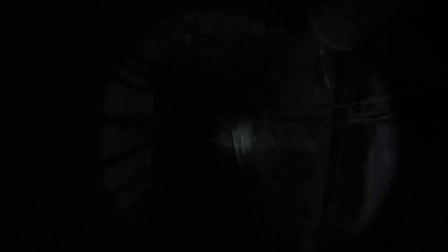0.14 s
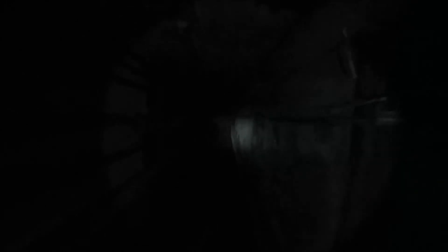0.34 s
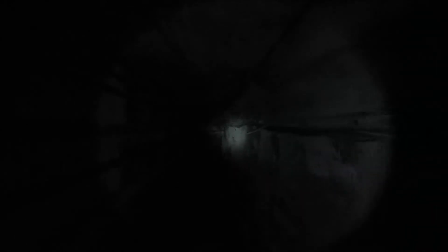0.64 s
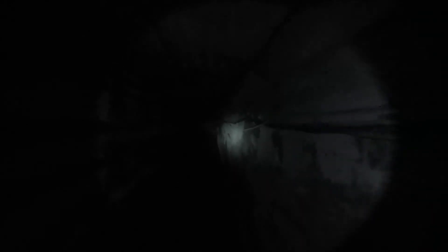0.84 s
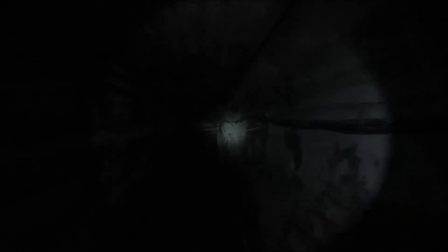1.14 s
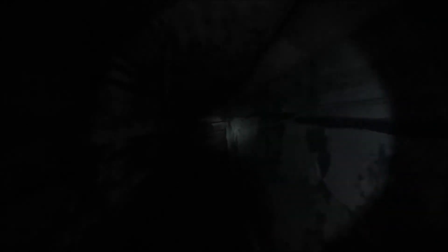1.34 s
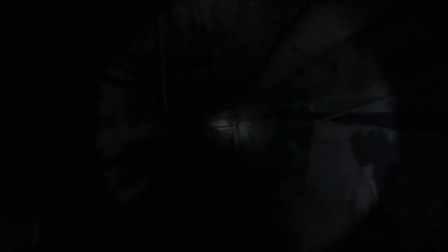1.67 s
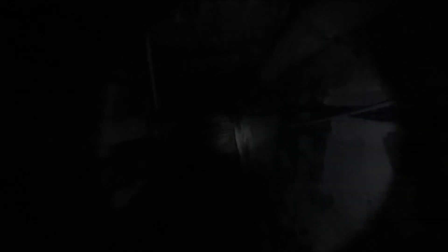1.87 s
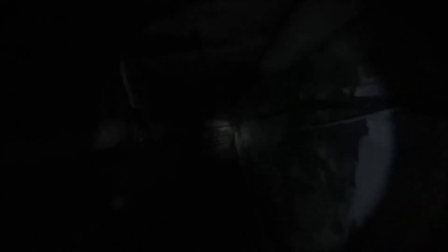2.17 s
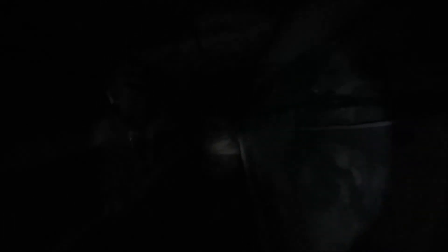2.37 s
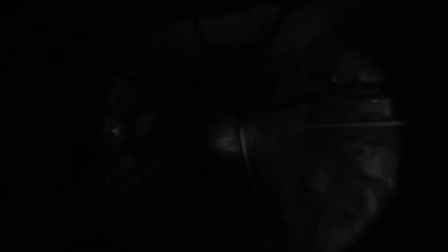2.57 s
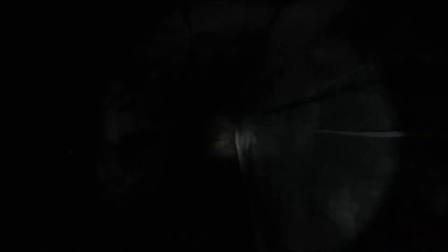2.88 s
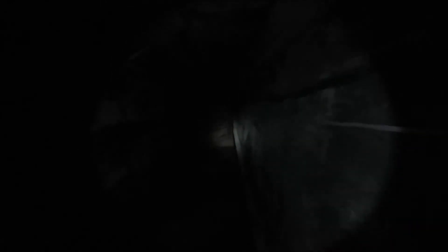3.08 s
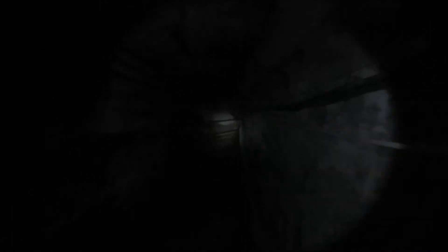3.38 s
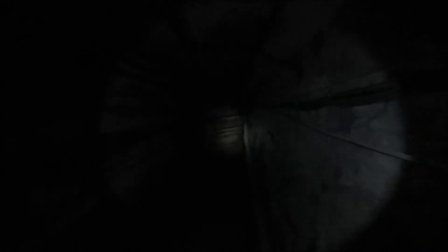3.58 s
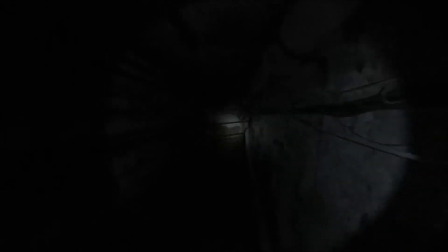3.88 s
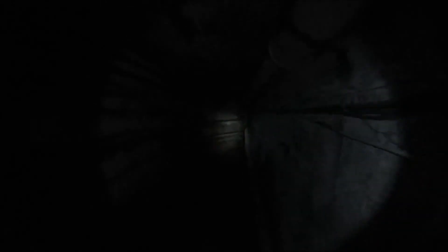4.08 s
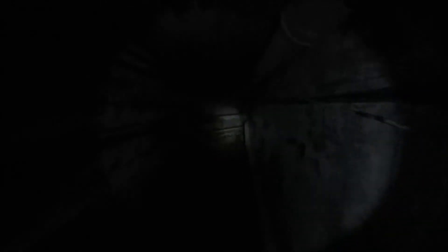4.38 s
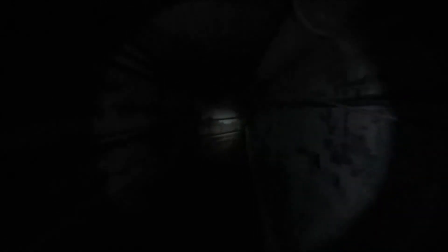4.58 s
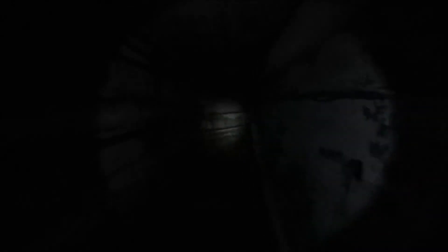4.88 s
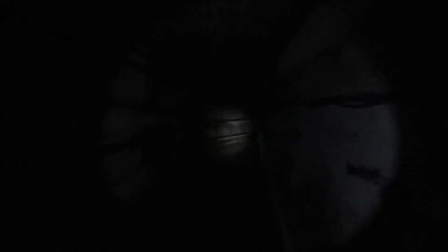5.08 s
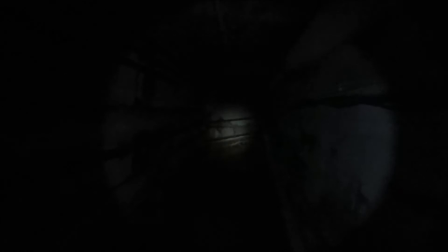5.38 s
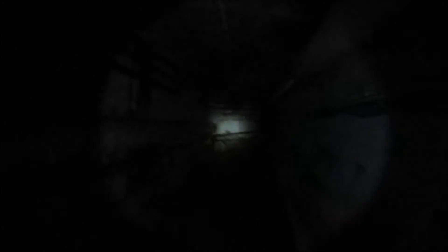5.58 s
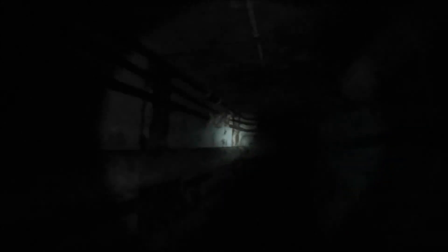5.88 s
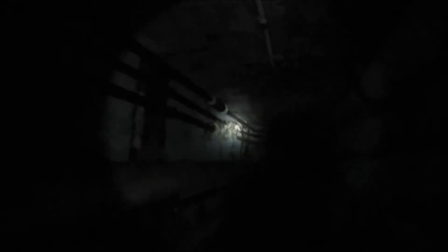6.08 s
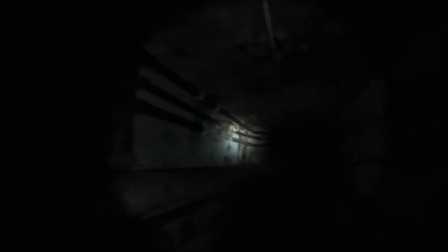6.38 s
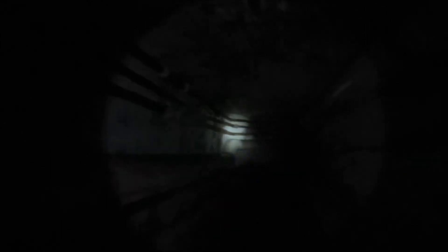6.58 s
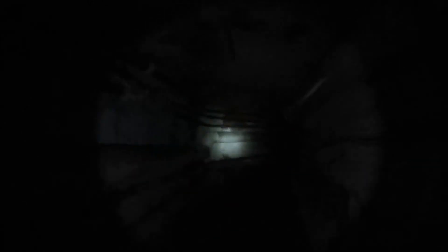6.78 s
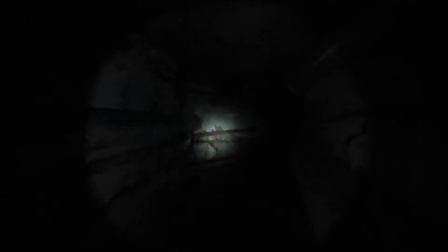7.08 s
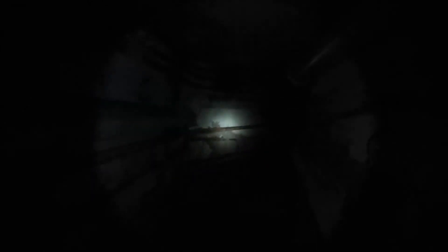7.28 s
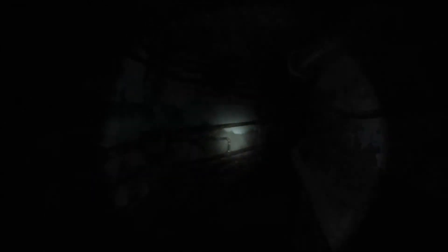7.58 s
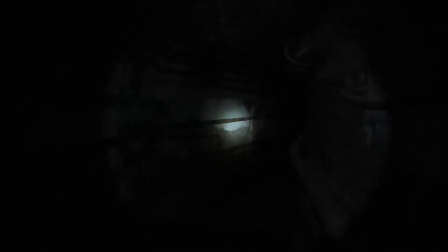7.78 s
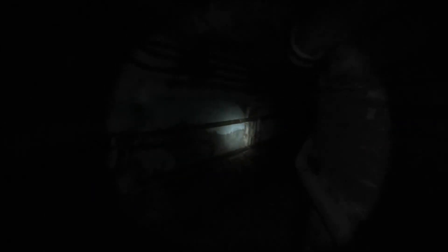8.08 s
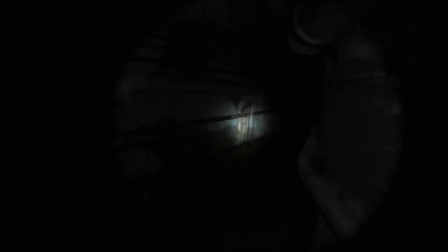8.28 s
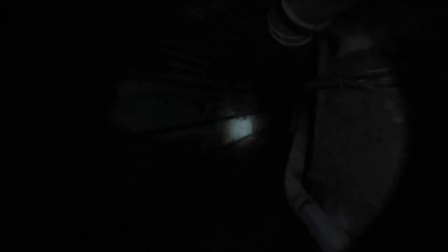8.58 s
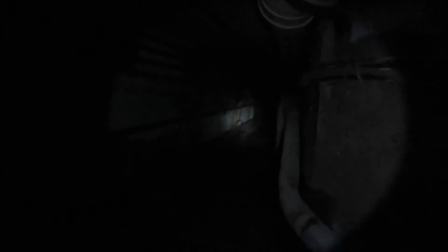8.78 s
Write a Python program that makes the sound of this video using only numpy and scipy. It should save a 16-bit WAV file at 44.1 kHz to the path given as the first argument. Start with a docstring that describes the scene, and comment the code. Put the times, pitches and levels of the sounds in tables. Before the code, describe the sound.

A walker moves through a narrow round concrete tunnel, carrying the microphone. Shoes grind over sand and fine grit in short uneven scuffs, several each second, with tiny grains ticking between. Dull knocks and a strong scrape come within the first half second; a sharp stony clack at 1.4 s is the clearest knock, followed at once by a bright scuff. Softer drags and crunches follow around 2 to 3.6 s, a small cluster of clicks at 3.8, and the hardest grinding step at 4.85. Steps go on to the end at 9 s, with stone ticks near 6.1 and 6.8. Close wall reflections and a brief echo of under half a second surround them, and heavy treads leave a faint low hollow ring. Dry, dull hand bumps sit close, scattered from 1.1 s, strongest near 6.25, 6.9 and 7.85 s. Faint hiss and unsteady low rumble lie underneath.

```python
"""Footsteps in a round concrete tunnel: someone walks over a gritty floor, carrying a camera.
Soles grind as shaped bursts of random grains; heels and loose stones clack as fading noise and rings.
Random close reflections and a short decaying echo answer them, and heavy treads ring the air across the tube.
Close by, the hand bumps the camera, over a faint rumble and hiss of filtered noise."""
import sys
import numpy as np
from scipy import signal
from scipy.fft import rfft, irfft, next_fast_len
from scipy.io import wavfile
from scipy.ndimage import map_coordinates

SR = 44100
rng = np.random.default_rng(int(sys.argv[2]) if len(sys.argv) > 2 else 0)


def file_out(sig):
    """Save sig as 16-bit WAV at sys.argv[1]."""
    # one column per channel
    cols = np.atleast_2d(sig).T
    # limit, then scale
    lim = np.clip(cols, -1, 1)
    pcm = np.round(lim * 32767).astype(np.int16)
    wavfile.write(sys.argv[1], SR, pcm)


N = 394254  # samples in the scene


def amp(db):
    """Decibels to gain."""
    return 10 ** (np.asarray(db) / 20)


def unit(x):
    """Scale x to rms 1."""
    return x / np.sqrt(np.mean(x ** 2) + 1e-20)


def along(points, hz):
    """Read (Hz, value) points between their frequencies on a log axis."""
    f, v = np.transpose(points)
    return np.interp(np.log(hz + 1), np.log(f), v)


def wobble(rate):
    """A smooth random curve through normal draws, rate knots a second."""
    knots = rng.standard_normal(int(N * rate / SR) + 4)
    return map_coordinates(knots, [np.arange(N) * rate / SR])


def filtered(x, response):
    """Shape the spectrum of x by a response over frequency."""
    size = x.shape[-1]
    m = next_fast_len(size + 8192)  # padded with silence
    return irfft(rfft(x, m) * response(np.fft.rfftfreq(m, 1 / SR)), m)[..., :size]


def causal(gain, size=2048):
    """Minimum-phase impulse response of energy 1 for a gain over frequency."""
    cepstrum = irfft(np.log(np.maximum(gain(np.fft.rfftfreq(size, 1 / SR)), 1e-6)))
    # folding the cepstrum onto positive times puts the energy as early as it can be
    cepstrum[1:size // 2] *= 2
    cepstrum[size // 2 + 1:] = 0
    response = irfft(np.exp(rfft(cepstrum)))
    return response / np.linalg.norm(response)


def add(track, s, sound):
    """Mix a sound into a track at s seconds."""
    part = track[..., max(round(s * SR), 0):][..., :sound.shape[-1]]
    part += sound[..., :part.shape[-1]]


def scuffs(level_db=-0.77, catch_db=0.9, own_db=1.62, hiss_fade=1.33, gravel_db=-9):
    """Soles grind over sand and a little gravel, catching and slipping as they go."""
    # Strokes of a sole over the floor. Each row: start in seconds, time to take the weight in seconds,
    # time under full weight in seconds, relative grinding level in dB, sand hiss in dB over it,
    # hollow scrape in dB over it.
    strokes = [ (0.318, 0.076, 0.065, -36.5, -1.5, -10), (.63, .01, 0.09, -49.5, -11, 0.5),
               (0.871, 0.087, 0.049, -38.5, 1.5, -8), (1.41, 0.012, 0.056, -40.5, 0.5, -10.5),
               (1.483, 0.0086, 0.045, -36, 1, -12.5), (1.7, .02, .07, -55, -22, -19),
               (2.004, 0.092, 0.03, -40.5, 0, -10.5), (2.425, 0.0044, 0.0073, -44.5, -1, -2),
               (2.505, 0.0078, 0.25, -44.5, -0.5, -9), (2.94, 0.0091, 0.025, -55, -8, -8),
               (3.07, 0.15, 0.083, -41.5, 0.5, -9), (3.617, 0.058, 0.19, -43.5, -1, -9),
               (3.844, 0.0087, 0.013, -36.5, -6.5, -21), (4.1, 0.0093, 0.013, -52.5, -5, -0.5),
               (4.184, 0.022, 0.071, -41.5, -4.5, -12), (4.372, 0.0074, 0.08, -40.5, 1.5, -11),
               (4.723, .01, 0.14, -44, -5.5, -12), (4.85, 0.048, 0.028, -31.5, 0.5, -15.5),
               (5, 0.011, 0.12, -52, -8, -6), (5.281, 0.061, 0.067, -39.5, -4, -13),
               (5.468, 0.022, 0.089, -44, -1.5, -9), (5.61, 0.026, 0.27, -53.5, -2, -8),
               (5.821, 0.034, 0.055, -38.5, -3, -8.5), (6.062, .005, 0.023, -38, -3.5, -12.5),
               (6.359, 0.05, .09, -41, -1, -8.5), (6.633, 0.051, 0.037, -47, 3, -6),
               (6.814, .01, 0.093, -35.5, -5, -8.5), (6.993, 0.007, 0.015, -41, -8, -7),
               (7.208, 0.018, 0.053, -48, 0.5, -4.5), (7.348, 0.0077, 0.034, -46, -18, -25),
               (7.47, 0.053, 0.065, -38.5, -3.5, -6.5), (7.771, 0.012, 0.05, -43.5, -1.5, -7),
               (7.99, 0.031, 0.082, -43.5, -9, -6), (8.16, 0.15, 0.095, -50, 4, -0.5),
               (8.386, 0.012, 0.12, -44.5, -3.5, -8.5), (8.551, 0.088, 0.037, -40.5, -5.5, -11),
               (8.883, 0.0058, 0.02, -41.5, 5.5, -7), ]
    touch_s, touch_db = 0.0071, -8.5  # fade-in of first contact, and its level under full weight
    sag_db_per_s, lift_db_per_s = 23, 123.5  # easing as the foot slows, further fading as it lifts
    t = np.arange(SR) / SR
    pressure = np.zeros((3, N))  # hollow, ringing and hissing range
    fade = np.array([[1], [1], [hiss_fade]])  # the hiss fades fastest on lifting
    for s, press, hold, db, hiss, hollow in strokes:
        # the sole touches lightly, takes the weight, slows down and lifts off
        contact_db = touch_db * np.maximum(1 - t / max(press, .002), 0)
        slowing_db = -sag_db_per_s * np.maximum(t - press, 0)
        lift_db = lift_db_per_s * fade * np.maximum(t - press - hold, 0)
        colour_db = np.array([[hollow], [0], [hiss]])
        stroke = amp(db + colour_db + contact_db + slowing_db - lift_db)
        add(pressure, s, np.minimum(t / touch_s, 1) * stroke)
    catching = amp(catch_db * wobble(110))
    sand = []
    for _ in pressure:  # each range has its own grains, in its own clumps
        fine = grit(rate=2600, spread_db=5.5)
        gravel = amp(gravel_db) * grit(rate=90, spread_db=2.5)
        clumps = amp(own_db * wobble(60))
        sand.append(unit((fine + gravel) * catching * clumps))
    return amp(level_db) * shoe(pressure * np.array(sand))


def clacks(level_db=-6, hollow_db=-2, crack_t60=0.0096, crunch_t60=0.046, attack=0.0013,
           skid_db=-21, skid_t60=0.46):
    """Each contact is a crack, a brief crunch and a fading skid; a loose stone rings with it."""
    # Clear knocks of heel, toe or stone. Each row: start in seconds, relative level in dB,
    # relative brightness in dB, relative hollow knock in dB, relative stone ring in dB.
    contacts = [ (0.072, -17, -13, -5.5, -7), (.3267, -28.5, 3, -6.5, -12), (0.378, -20, -12, -8.5, -7),
                (0.4286, -19, -30, -7, -18), (.634, -40, -17, 9.5, -12), (.8969, -27.5, -8, -16, -5),
                (.945, -28, 8, -1, -11), (1.4088, -13.5, -4, -12, -1.5), (1.414, -14, -13, -13, -6),
                (1.4967, -18.5, 3, -6.5, -17), (1.756, -39.5, 6, -19, -17), (1.819, -35, -9, -2, -18),
                (2.2294, -26.5, -17, -2, -6), (2.5168, -38, .5, -18, 1), (2.693, -26.5, -3, -6, -7),
                (3.2016, -27.5, -16, -24, -9), (3.3096, -36, -10, -1, -6), (3.6732, -27.5, 1.5, -4, -12),
                (3.8248, -25.5, -2, -14, -6), (3.8557, -21.5, -13, -32, -2.5),
                (4.0597, -39.5, -0.5, -16, -10), (4.374, -30, 7.5, -6, -23), (4.727, -33, -8, -17, -3),
                (4.853, -19.5, -2, -15, -21), (4.8901, -18.5, 0.5, -24, -15), (5.0597, -32, 2.5, -16, -17),
                (5.1512, -28.5, -19, -8, -19), (5.3495, -25, -23, -17, -7), (5.468, -23, -3, -22, -12),
                (5.8399, -28.5, -5, -14, -12), (6.061, -23, 2.5, -15, 0), (6.818, -24.5, -18, -8, 1),
                (7.0198, -33, -13, -10, -10), (7.3906, -32, -11, -24, -11), (7.769, -30, 1, -13, -19),
                (8.39, -32.5, -9, -2, -1.5), (8.4687, -33.5, 7, -13, -12), (8.734, -23.5, -13, -10, -11), ]
    # A loose stone rocking underfoot. Each row: nominal frequency in Hz, nominal relative level in dB,
    # T60 in seconds.
    stone_modes = [(2248, -4, 0.078), (2380, -4.5, 0.095), (2600, -12, 0.024), (3340, -7, 0.03),
                   (3676, -2.5, 0.021), (4750, -8, 0.033), (5380, -8.5, 0.052)]
    t = np.arange(SR // 4) / SR
    forces, stone = np.zeros((3, N)), np.zeros(N)
    give = 1 - np.exp(-t / attack)  # the rubber sole yields before it bites
    crack = amp(-60 * t / crack_t60)
    crunch = amp(-60 * t / crunch_t60)  # sand crushed under the knock
    skid = amp(skid_db - 60 * t / skid_t60)
    blow = give * (crack + crunch + skid)
    for s, db, bright, hollow, stone_db in contacts:
        noise = rng.choice([-1, 1], (3, len(t))) * blow
        colour_db = np.array([[hollow + hollow_db], [0], [bright]])
        add(forces, s, noise * amp(db + level_db + colour_db))
        ring = np.zeros(len(t))
        for hz, level, life in stone_modes:  # level and pitch vary a little at each contact
            decay = amp(level + rng.normal(0, 1) - 60 * t / life)
            ring += decay * np.sin(2 * np.pi * (hz * rng.normal(1, 0.028) * t + rng.random()))
        ring *= give
        add(stone, s, amp(db + stone_db) * ring / np.abs(ring).max())
    return shoe(forces) + stone


def crumbs(level_db=-60, bright_db=-5, hollow_db=-6):
    """Stray grains go on ticking under the standing foot."""
    return shoe([amp(level_db + db) * grit(rate=70, spread_db=6) for db in (hollow_db, 0, bright_db)])


def grit(rate, spread_db):
    """Sand grains crack at random moments, about rate a second, a few much larger than the rest."""
    sizes = amp(spread_db * np.minimum(rng.standard_normal(N), 2)) * rng.choice([-1, 1], N)
    return unit(sizes * (rng.random(N) < rate / SR))


def shoe(forces, low_hz=1800, high_hz=3400):
    """Three forces sound the hollow, the ringing and the hissing range of a shoe on concrete."""
    # Colour of shoe on concrete. Each row: frequency in Hz, relative level in dB within its range.
    shoe_colour = [(150, -32), (350, -23), (650, -23), (900, -17.5), (1230, -8.5), (1420, -13), (1850, -13),
                   (2350, -2.5), (3100, -11.5), (4000, -11), (5300, -9), (7500, -15.5), (8900, -24.5),
                   (10600, -20.5)]

    def above(hz, edge):
        return 1 / (1 + (edge / (hz + 1)) ** 12)

    # share of the power in each range
    ranges = [lambda hz: 1 - above(hz, low_hz),
              lambda hz: above(hz, low_hz) - above(hz, high_hz),
              lambda hz: above(hz, high_hz)]
    sound = np.zeros(N)
    for force, share in zip(forces, ranges):
        body = causal(lambda hz: np.sqrt(np.abs(share(hz))) * amp(along(shoe_colour, hz)))
        sound += signal.fftconvolve(force, body)[:N]
    return sound


def tunnel(x, wet_db, walls_db, walls_t60, count=6):
    """The sounding grains lie at ever different spots, each with its own path round the tube."""
    spot = np.arange(N) / SR / .016  # moves to the next of count paths every 16 ms, in a cycle
    out = np.array([x, x])  # direct sound, equal at both microphones
    for k in range(count):
        distance = np.abs((spot - k + count / 2) % count - count / 2)
        share = np.cos(np.pi / 2 * np.minimum(distance, 1))  # equal-power crossfade
        path = answer(wet_db, walls_db, walls_t60)
        out += signal.fftconvolve((x * share)[None], path, axes=1)[:, :N]
    return out / np.sqrt(1 + amp(wet_db) ** 2 + amp(walls_db) ** 2)


def answer(wet_db, walls_db, walls_t60):
    """Close reflections of the curved wall, with the echo along the tube swelling in and decaying."""
    # Decay along the tunnel. Each row: frequency in Hz, T60 in seconds.
    tunnel_decay = [(250, 0.37), (1100, 0.43), (2400, 0.34), (5000, 0.45), (10000, 0.21)]
    t = np.arange(SR) / SR
    hz, lag, z = signal.stft(diffuse(SR), SR, nperseg=256)
    decay = amp(-60 * lag / along(tunnel_decay, hz)[:, None])
    tail = signal.istft(z * decay, SR, nperseg=256)[1][:, :SR]
    tail = tail * (1 - np.exp(-t / 0.0039))
    walls = diffuse(SR) * amp(-60 * t / walls_t60) * (t > .002)  # none nearer than 2 ms
    echo = amp(wet_db) * tail / np.linalg.norm(tail[0])
    return echo + amp(walls_db) * walls / np.linalg.norm(walls[0])


def diffuse(size):
    """Stereo noise as it arrives from all round the tube."""
    # Diffuse sound. Each row: frequency in Hz, left-right correlation.
    likeness = [(150, 0.28), (350, -0.12), (650, -0.49), (1200, 0.12), (1450, 0.17), (2200, 0.49),
                (3400, 0.22), (5300, 0.81), (7100, -0.045), (10000, 0.41)]

    def spread(hz):
        turn = np.arccos(np.clip(along(likeness, hz), -.95, .95)) / 2
        return np.array([np.cos(turn), np.sin(turn)])

    mid, side = filtered(rng.standard_normal((2, size)), spread)
    return np.array([mid + side, mid - side])


def boom():
    """Heavy treads leave the air ringing faintly in standing waves across the tube."""
    # Heavy treads. Each row: start in seconds, relative level in dB.
    treads = [(0.071, -68), (1.421, -63), (3.2, -61.5), (4.87, -60), (6.07, -61), (6.82, -66)]
    # Standing waves across the tube. Each row: nominal frequency in Hz, relative level in dB,
    # T60 in seconds.
    cross_modes = [(185, -23, .8), (238.5, 1, 2.3), (342, 2.5, 0.81), (379, 6.5, 0.28)]
    track, t = np.zeros(N), np.arange(2 * SR) / SR
    for s, db in treads:
        ring = np.zeros(len(t))
        for hz, level, t60 in cross_modes:  # pitch varies slightly from tread to tread
            decay = amp(level - 60 * t / t60)
            ring += decay * np.sin(2 * np.pi * hz * rng.normal(1, 0.0086) * t)
        add(track, s, amp(db) * ring * (1 - np.exp(-t / 0.004)))
    return track


def bumps(cycles=0.23, case_hz=370, case_db=-2, knock_t60=0.047):
    """A bump pushes the camera body once to and fro, and its case gives a dull knock."""
    # Bumps of the hand on the camera. Each row: time in seconds, peak level of the push in dB,
    # frequency of its sine in Hz, relative knock of the case in dB.
    hand_bumps = [(1.13, -45.5, 169, -12), (1.227, -44, 140, -8), (1.31, -47, 150, -6),
                  (1.707, -42.5, 161, -13), (2.233, -42.5, 129, -5.5), (3.054, -37, 117, -23),
                  (3.202, -39.5, 208, -4), (3.323, -40, 102, -11), (3.409, -43.5, 80, -12),
                  (4.501, -43, 108, -7), (4.866, -43.5, 119, -3), (6.066, -39.5, 114, -4),
                  (6.232, -35, 115, -22), (6.261, -28.5, 60.3, -21), (6.413, -37, 105, -8.5),
                  (6.472, -37.5, 163, -2), (6.748, -43, 132, -7), (6.934, -31.5, 95, -12),
                  (7.83, -26, 107, -18), (7.848, -28, 104, -18), (8.09, -43.5, 97, -10),
                  (8.33, -43, 148, -11)]
    track, t = np.zeros(N), np.arange(-SR // 20, SR // 20) / SR

    def case(hz):
        return hz / case_hz / (1 + (hz / case_hz) ** 6)

    for s, db, hz, knock_db in hand_bumps:
        # a sine under a narrow bell, centred on the bump
        push = np.sin(2 * np.pi * hz * t) / np.cosh(np.minimum(np.abs(t * hz / cycles), 20))
        add(track, s + t[0], amp(db) * rng.choice([-1, 1]) * push / np.abs(push).max())
        thud = unit(filtered(rng.standard_normal(len(t)), case))
        knock = thud * amp(-60 * (t - t[0]) / knock_t60)
        add(track, s, amp(db + knock_db + case_db) * knock)
    return track


def background(hiss_db=-52.0, rumble_db=-58.0, drift_db=-1.1, lumps_db=2.5):
    """Faint air noise all round in the tube, and the wavering rumble of the carried camera."""
    # Air noise. Each row: frequency in Hz, relative level in dB.
    hiss_colour = [(120, -7), (250, -5.5), (360, -1.5), (500, -4), (750, -5), (1000, -5), (1240, 1),
                   (1420, -8), (1850, -5), (2380, 1), (3200, -6.5), (5300, -7.5), (8800, -14),
                   (10800, -16.5)]
    # Rumble of the camera. Each row: frequency in Hz, relative level in dB.
    rumble_colour = [(12, -22), (25, -1), (48, 0), (100, -5.5), (170, -14), (280, -24), (600, -75),
                     (1500, -100)]
    hiss = unit(filtered(diffuse(N), lambda hz: amp(along(hiss_colour, hz))))
    rumble = unit(filtered(rng.standard_normal(N), lambda hz: amp(along(rumble_colour, hz))))
    hiss_gain = amp(hiss_db + drift_db * wobble(3.9))
    rumble_gain = amp(rumble_db + lumps_db * wobble(19))
    return hiss * hiss_gain + rumble * rumble_gain


def scene():
    """Steps in the tube, with the handling noise close by."""
    soles = tunnel(scuffs() + crumbs(), wet_db=-6.0, walls_db=1.0, walls_t60=0.082)
    heels = tunnel(clacks(), wet_db=-2.5, walls_db=-1.5, walls_t60=0.057)
    return soles + heels + boom() + bumps() + background()


def record(dry):
    """The two microphones differ a little in colour; a steep filter cuts the top."""
    # Microphone pair. Each row: frequency in Hz, left minus right in dB.
    lean = [(200, 0.45), (500, 0), (1200, -1.5), (1750, -6.5), (2000, 5.5), (2400, 2), (2800, 0.5),
            (5400, 1.5), (6500, -1), (7200, 0.4)]
    top_hz = 11200
    coloured = filtered(dry, lambda hz: amp(np.outer([.5, -.5], along(lean, hz))))
    return filtered(coloured, lambda hz: 1 / (1 + (hz / top_hz) ** 150))


dry = scene()
out = record(dry)
file_out(out)
```